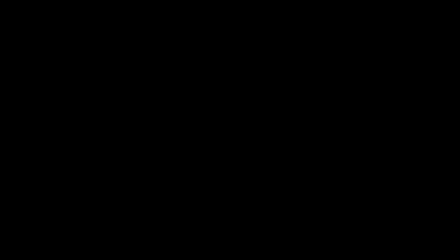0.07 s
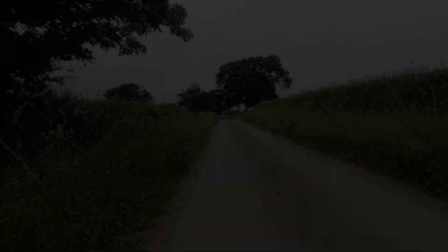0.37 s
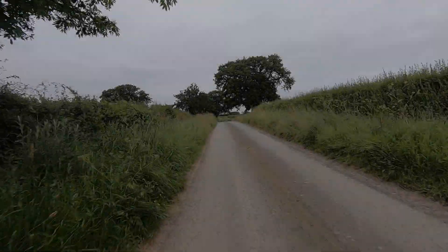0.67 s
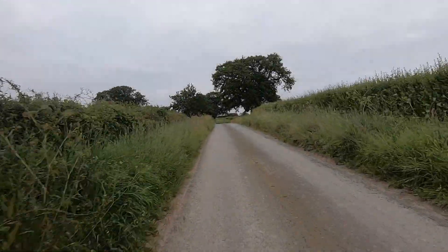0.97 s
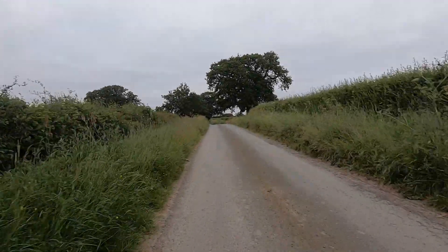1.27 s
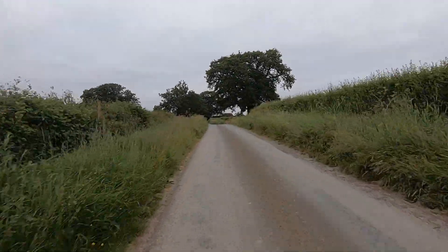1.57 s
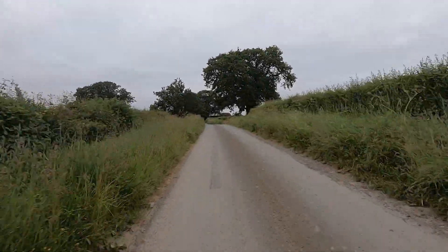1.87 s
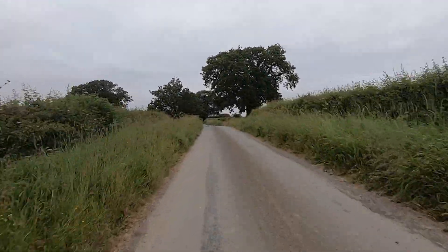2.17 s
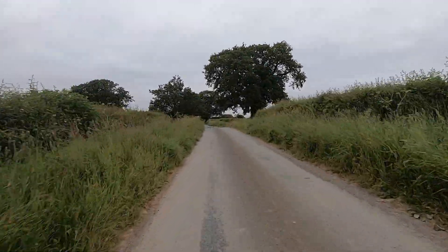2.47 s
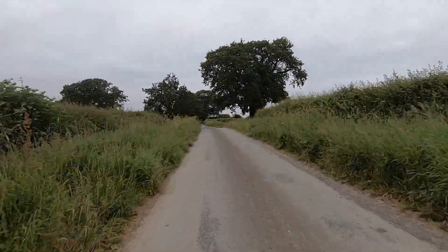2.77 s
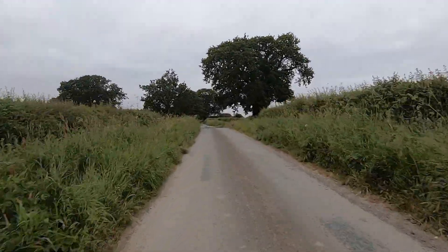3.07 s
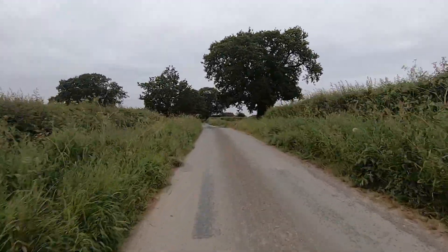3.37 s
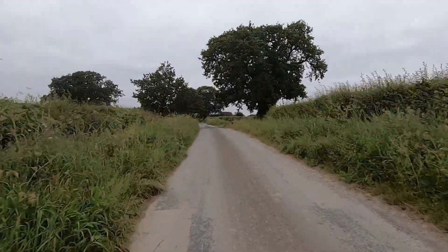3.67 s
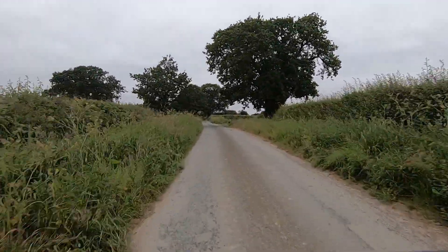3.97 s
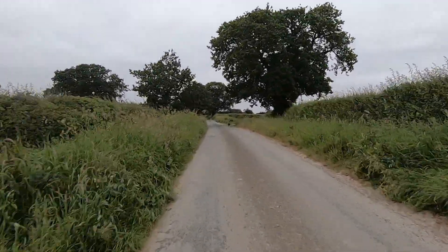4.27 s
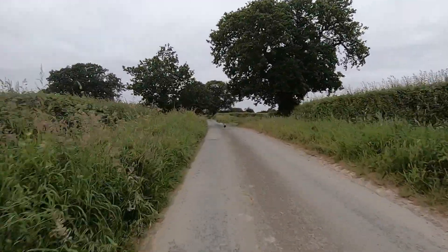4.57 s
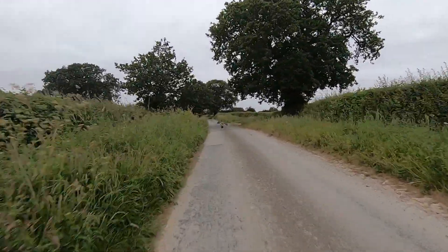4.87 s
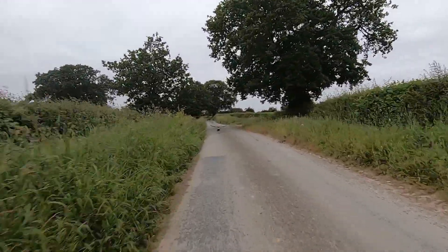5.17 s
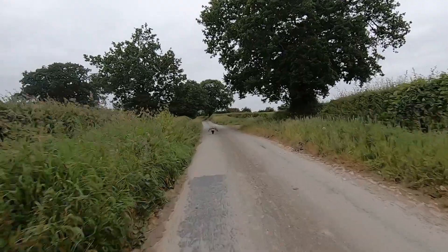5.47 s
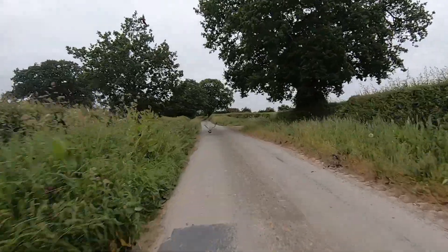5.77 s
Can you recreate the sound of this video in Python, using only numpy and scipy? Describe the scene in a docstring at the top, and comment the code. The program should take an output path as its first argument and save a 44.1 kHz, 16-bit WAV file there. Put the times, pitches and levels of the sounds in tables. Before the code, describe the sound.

Wind starts on the microphone almost at once, a low buffeting rumble that swells in short, irregular gusts and carries on to the end. The microphone rides on a bicycle in a country lane, and a soft, grainy tyre hiss and wheel whirr sit under the wind throughout. A few faint ticks come from a loose fitting in the first second. From about 1.6 to 2.9 seconds it rattles in quick, bright clusters with duller frame chatter, and again from 3.5 to 4.2 seconds. A crow then caws three times, at about 4.3, 4.8 and 5.3 seconds. Each caw is short, harsh and hoarse, rising then sagging in pitch, with a faint echo off the trees; the third is the loudest. The bicycle gives sharp clacks at about 5.0 and 5.7 seconds, and a strong gust hits just before the end.

```python
"""Crow over a country lane, from a bicycle.

The camera rides on the bicycle, so wind buffets its microphone. Close by, the tyres hiss on the
tarmac and a loose fitting rattles over the rough patches. A crow caws three times, harsh pulses
from its syrinx ringing throat, chest and beak, with a faint echo off the far trees."""
import sys
import numpy as np
from scipy import signal
from scipy.fft import rfft, irfft, next_fast_len
from scipy.io import wavfile
from scipy.ndimage import uniform_filter1d

SR = 44100
rng = np.random.default_rng(int(sys.argv[2]) if len(sys.argv) > 2 else 0)


def store_pcm(level_fs):
    """Save levels as 16-bit WAV."""
    pcm = np.round(np.clip(level_fs, -1, 1) * 32767).astype(np.int16)
    wavfile.write(sys.argv[1], SR, np.atleast_2d(pcm).T)


N = 261954
T = np.arange(N) / SR
LEAD_S = 0.015  # lead-in for the short fade-in before each tick's peak


def undb(db):
    """Decibels to gain."""
    return 10 ** (np.asarray(db) / 20)


def unit(x):
    """Scale to rms 1."""
    return x / np.sqrt(np.mean(x ** 2) + 1e-20)


def steady(x, span_s=0.021):
    """Hold the running rms near 1, keeping faster flutter."""
    return x / np.sqrt(uniform_filter1d(x ** 2, int(span_s * SR)) + 0.0011 * np.mean(x ** 2))


def curves(table, at):
    """Interpolate a table's later columns along its first."""
    points, *columns = np.transpose(table)
    return [np.interp(at, points, column) for column in columns]


def add(out, start_s, x):
    """Mix x into out from start_s on."""
    i = int(start_s * SR)
    out[i:i + len(x)] += x[:N - i]


def wander(size, hz):
    """A smooth random drift of rms 1 that moves up to about hz times a second."""
    f = np.arange(size // 2 + 1) * SR / size
    return unit(irfft(rfft(rng.standard_normal(size)) * np.exp(-(f / hz) ** 2), size))


def noise(spectrum):
    """Noise of rms 1, shaped by (Hz, dB) points."""
    hz, db = np.transpose(spectrum)
    size = next_fast_len(N, True)
    f = np.arange(size // 2 + 1) * SR / size
    gain = undb(np.interp(np.log(f + 1), np.log(hz), db))
    return unit(irfft(rfft(rng.standard_normal(size)) * gain, size)[:N])


def resonate(x, modes):
    """Parallel (Hz, width Hz, dB) resonances, each applied twice for deep valleys between them."""
    out = 0
    for hz, width, db in modes:
        b, a = signal.iirpeak(min(hz, 0.45 * SR), hz / width, SR)
        out = out + undb(db) * signal.lfilter(b, a, signal.lfilter(b, a, x))
    return out


def glide(x, hz, width_hz):
    """A moving resonance: shift its band down to zero, smooth twice and shift it back."""
    turn = np.exp(2j * np.pi * np.cumsum(hz) / SR)
    pole = np.exp(-np.pi * width_hz / SR)
    return (turn * signal.lfilter([(1 - pole) ** 2], [1, -2 * pole, pole ** 2], x / turn)).real


def wind(flutter_db=-13, rush_share=0.26):
    """Buffeting right on the microphone swells in gusts; eddies shake the flutter and rush above it."""
    # Airflow between gusts. Each row: time in seconds, relative dB of the buffeting and of the rush.
    airflow = [(0.12, -23, -46.5), (0.33, -25, -56.5), (0.44, -22.5, -42.5), (0.56, -21, -45),
               (0.7, -19, -46), (1.25, -20, -48.5), (1.85, -21.5, -48.5), (2.2, -18.5, -45.5),
               (2.7, -23, -52.5), (3.03, -24, -45), (3.35, -20, -47.5), (3.7, -23.5, -50), (3.95, -26, -46),
               (4.08, -20.5, -44.5), (4.35, -26.5, -49.5), (4.72, -26.5, -47), (4.95, -24, -44),
               (5.15, -23.5, -44.5), (5.55, -26, -42.5), (5.94, -20, -44.5)]
    # Gusts. Each row: middle and length in seconds, lift in dB of the buffeting and of the flutter.
    gusts = [(0.218, 0.1, 5, 6.5), (0.427, 0.11, 5, 8.5), (0.545, 0.08, 6.5, 11.5), (0.626, 0.059, 4, 10),
             (0.955, 0.054, 4.5, 8), (1.041, 0.037, 0.5, 6.5), (1.997, 0.036, 6, 1), (2.275, 0.072, 5, 8),
             (3.028, 0.074, 3.5, 4.5), (3.145, 0.12, 6.5, 1.5), (3.484, 0.05, 1, 1),
             (3.817, 0.077, 7.5, 3.5), (4.18, 0.12, 7.5, 6), (4.53, 0.11, 8, 11.5), (4.849, 0.087, 5, 8.5),
             (5.473, 0.13, 6, 1), (5.666, 0.09, 5.5, 9), (5.75, 0.025, 12, 7.5), (5.888, 0.031, 1, 14)]
    # The wind's low, middle and high bands. Each row: frequency in Hz, relative level in dB.
    buffet_spectrum = [(10, -16.5), (25, -2), (45, -2), (72, 3), (92, -2), (122, -5.5), (160, -16),
                       (260, -23), (600, -91), (3000, -120)]
    flutter_spectrum = [(80, -5.5), (170, 2), (250, -3), (360, -2.5), (480, -12.5), (750, -21.5),
                        (1500, -37), (4000, -69), (12000, -94)]
    rush_spectrum = [(300, 7), (600, 6), (850, -2.5), (1250, 1.5), (2500, -6), (5000, -17.5), (9000, -39),
                     (13000, -61.5)]
    flow_db, rush_db = curves(airflow, T)
    low_lift_db, high_lift_db = np.zeros(N), np.zeros(N)
    for middle_s, length_s, low_db, high_db in gusts:
        swell = np.exp(-(2 * (T - middle_s) / length_s) ** 2)
        low_lift_db += low_db * swell
        high_lift_db += high_db * swell
    eddies = wander(N, hz=69)
    buffet = steady(noise(buffet_spectrum), span_s=0.16)
    flutter = unit(noise(flutter_spectrum) * undb(2.5 * eddies))
    rush = unit(noise(rush_spectrum) * undb(1.5 * eddies))
    return (undb(flow_db + 0.5 + low_lift_db) * buffet
            + undb(flow_db + flutter_db + high_lift_db) * flutter
            + undb(rush_db + 3.5 + rush_share * high_lift_db) * rush)


def tyres(gain_db=4, grain_db=2):
    """Close by, the tyres hiss, grainy with the lane's chippings, and the wheels whirr."""
    # The road surface. Each row: time in seconds, relative tyre noise in dB.
    road = [(0.35, -55.5), (0.5, -57), (1.15, -58), (1.41, -56), (1.63, -53), (2.2, -56.5), (2.69, -57.5),
            (3.05, -55), (3.51, -54.5), (3.89, -56), (4.11, -55), (4.2, -59)]
    # Tyre hiss as coloured by the microphone. Each row: frequency in Hz, relative level in dB.
    hiss_spectrum = [(700, -25), (1400, -1.5), (2100, 3), (2900, 2), (3200, 0.5), (3550, 8), (4150, 2.5),
                     (4500, -8.5), (5000, -8.5), (5400, -25), (6400, -15), (7400, -23.5), (8100, -16),
                     (8800, -19.5), (10500, -29.5), (12000, -56)]
    # Resonances of the rolling wheels. Each row: frequency and width in Hz, gain in dB.
    wheel_modes = [(950, 95, 7.5), (1205, 150, 8), (1680, 120, 1.5), (1880, 130, -2), (2400, 300, -7),
                   (3790, 160, 5.5), (4750, 350, -16)]
    road_db, = curves(road, T)
    hiss = noise(hiss_spectrum) * undb(grain_db * wander(N, hz=90))
    whirr = undb(1.2) * unit(resonate(rng.standard_normal(N), wheel_modes))
    return undb(road_db + gain_db) * (hiss + whirr)


def contact(modes, peak_s, rise_s, decay_s, buzz_db, buzz_s):
    """Two parts snap together at LEAD_S + peak_s and buzz apart in tiny impacts that ring their modes."""
    t = T[:SR // 20] - LEAD_S - peak_s
    snap = np.exp(-np.abs(t) / np.where(t < 0, rise_s, decay_s))
    buzz = undb(buzz_db) * np.exp(-np.abs(t) / np.where(t < 0, buzz_s / 2, buzz_s))
    impacts = rng.laplace(size=len(t))
    impacts[np.argmin(np.abs(t))] = 7  # the one hard blow
    ring = resonate((snap + buzz) * impacts, modes)
    return ring / np.sqrt(uniform_filter1d(ring ** 2, SR // 500).max())  # loudest 2 ms at rms 1


def tick(detune=0.04, spread_db=3):
    """The loose fitting strikes, never quite on the same spot: bright snap, low knock, thin after-ring."""
    # The fitting's three sets of resonances. Each row: frequency and width in Hz, gain in dB.
    snap_modes = [(4490, 2030, 19), (5420, 720, 14), (7530, 1600, 16.5), (8470, 1540, 10.5),
                  (9900, 300, -12), (14300, 740, -4)]
    knock_modes = [(1870, 600, 3.5), (2350, 640, 4.9), (3696, 250, 7.5)]
    ring_modes = [(5970, 180, -6), (8420, 240, 0.5), (10240, 200, -7)]
    chance = rng.uniform(-1, 1, (len(snap_modes), 2))
    struck = [(hz * (1 + detune * shift), width, db + spread_db * lift)
              for (hz, width, db), (shift, lift) in zip(snap_modes, chance)]
    snap = contact(struck, peak_s=0.0022, rise_s=0.0011, decay_s=0.0012, buzz_db=-12.5, buzz_s=0.013)
    knock = contact(knock_modes, peak_s=0.00069, rise_s=0.0016, decay_s=0.0053,
                    buzz_db=-37, buzz_s=0.006)
    ring = contact(ring_modes, peak_s=0.002, rise_s=0.001, decay_s=0.008, buzz_db=-11, buzz_s=0.015)
    return snap + undb(-3) * knock + undb(-22) * ring


def rattles(tick_db=-2, clack_db=-3, chatter_db=-5, strays_per_s=3.4):
    """Close to the microphone, bumps shake the fitting, the frame chatters and something clacks."""
    # Further single ticks, many following closely on one another, sharp clacks and dull frame chatter. Each
    # row: time in seconds, relative peak in dB.
    ticks = [(0.468, -45), (0.5994, -46.5), (0.756, -47.5), (1.6, -33), (1.7892, -46.5), (1.936, -42),
             (1.993, -34), (2.038, -37), (2.412, -48), (2.448, -44), (2.621, -36.5), (2.711, -44),
             (2.8703, -41), (3.0176, -48), (3.318, -50), (3.593, -53), (3.673, -39), (3.693, -39),
             (3.7275, -32.5), (3.766, -38.5), (3.7927, -37.5), (3.833, -37), (4.016, -40), (4.046, -36),
             (4.101, -31), (4.173, -39.5), (4.243, -52), (5.2534, -35.5)]
    clacks = [(3.756, -33), (5.0273, -23.5), (5.6786, -24)]
    chatter = [(2.308, -34), (2.4112, -35), (2.4284, -31.5), (2.49, -28), (2.537, -37), (3.9543, -35),
               (3.9732, -34), (4.087, -26.5), (5.727, -27.5)]
    # The fitting bouncing. Each row: start in seconds, number of ticks, gap in seconds, relative
    # first peak in dB, growth to the last in dB, offset of every second tick in dB.
    bounces = [(1.0582, 2, 0.041, -44.5, -2, 1), (1.685, 3, 0.02, -42, 0, 7),
               (2.0916, 2, 0.037, -37, 4.5, -0.5), (2.2622, 2, 0.025, -35.5, -3, -0.5),
               (2.3151, 3, 0.022, -35, 2.5, -6), (2.4953, 3, 0.027, -35.5, 1.5, -10),
               (3.486, 3, 0.025, -43.5, 11, 0.5), (3.6349, 3, .031, -32, 0.5, 2),
               (3.853, 3, .029, -33, 2.5, -8)]
    # Resonances of the clacking part and the frame. Each row: frequency and width in Hz, gain in dB.
    clack_modes = [(3270, 1000, -2), (4830, 460, -11.5), (6300, 1000, -14.5), (8240, 490, -18.5)]
    frame_modes = [(1790, 660, 0), (2460, 410, -5), (3180, 1230, -3.5), (4700, 730, -16)]
    out = np.zeros(N)
    for s, db in ticks:
        add(out, s - LEAD_S, undb(db + tick_db) * tick())
    for s, count, gap_s, first_db, growth_db, rebound_db in bounces:
        for k, grown_db in enumerate(np.linspace(0, growth_db, round(count))):
            db = first_db + grown_db + rebound_db * (k % 2)
            add(out, s + k * gap_s - LEAD_S, undb(db + tick_db) * tick())
    for s, db in clacks:
        clack = contact(clack_modes, peak_s=0.0017, rise_s=0.00051, decay_s=0.00097,
                        buzz_db=-11, buzz_s=0.012)
        add(out, s - LEAD_S, undb(db + clack_db) * clack)
    for s, db in chatter:
        shake = contact(frame_modes, peak_s=0.0015, rise_s=0.00088, decay_s=0.0026,
                        buzz_db=-9, buzz_s=0.032)
        add(out, s - LEAD_S, undb(db + chatter_db) * shake)
    for when, strength in rng.random((round(strays_per_s * T[-1]), 2)):  # faint stray ticks
        add(out, when * T[-1], undb(-58.75 + 7 * strength) * tick())
    return out


def syrinx(pitch_hz, strain, throb_db, hoarseness, throb_hz=47, doubling=0.6):
    """Unsteady membranes chop the breath into pulses; returns the voice and an airy one for the rasp."""
    size = len(pitch_hz)
    # A slow, uneven second oscillation shakes both pitch and level: the harsh throb.
    throb = 2 * np.pi * np.cumsum(throb_hz * (1 + 0.2 * wander(size, hz=42))) / SR
    jitter = 0.0263 * wander(size, hz=320) + 0.0132 * wander(size, hz=40) - 0.026 * np.cos(throb)
    roughness = undb(strain * (throb_db * np.sin(throb) + wander(size, hz=220)))
    phase = 2 * np.pi * np.cumsum(pitch_hz * (1 + strain * jitter)) / SR
    # The overtones arrive out of step, which smears the pulses.
    pulses = unit(sum(np.cos(k * phase + 2 * np.pi * rng.random()) for k in range(2, 28)))
    air = unit(rng.standard_normal(size) * (1 + 0.5 * np.cos(phase)))
    alternation = doubling * pulses * np.cos(phase / 2)  # strong and weak pulses take turns
    voice = roughness * (pulses + hoarseness * strain ** 2 * (air + alternation))
    return voice, roughness * (pulses + 0.78 * air)


def rasp(airy_voice, closing, open_hz=6370, shut_hz=5800):
    """The airy voice rings high resonances and a hiss that sinks as the beak closes."""
    # The steady treble resonances. Each row: frequency and width in Hz, gain in dB.
    rasp_modes = [(4700, 420, -9), (5900, 2050, 12.5), (9600, 3000, -12), (13000, 3100, -14)]
    hiss = glide(airy_voice, open_hz + (shut_hz - open_hz) * closing, width_hz=1100)
    return steady(resonate(airy_voice, rasp_modes)) + undb(-1.5) * steady(hiss)


def caw(length_s, top_hz, scoop, sag, level_db, chest_db, dip_db, throb_db, hoarseness,
        crest_s=0.078, open_hz=2310, shut_hz=1590):
    """The beak opens to a crest and closes; pitch, throat resonance and level follow the same arch."""
    # The bird's resonances. Each row: frequency and width in Hz, gain in dB.
    side_cavity = [(1980, 330, -3.5)]
    windpipe_modes = [(1750, 100, -7)]
    chest_modes = [(1465, 260, 0)]
    beak_modes = [(2654, 520, 1), (3105, 290, 0.5)]
    t = T[:int(length_s * SR)]
    to_open = np.clip(1 - t / crest_s, 0, 1)
    closing = np.clip((t - crest_s) / (length_s - crest_s), 0, 1)
    crest = np.exp(-((t - crest_s) / 0.03) ** 2)
    pitch_hz = top_hz * (1 - scoop * to_open ** 2 - sag * closing ** 2)
    strain = 1 - 0.6 * closing  # the roughness calms towards the end
    voice, airy_voice = syrinx(pitch_hz, strain, throb_db, hoarseness)
    voice = voice - resonate(voice, side_cavity)  # the throat's side cavity swallows one band
    throat_hz = open_hz + (shut_hz - open_hz) * (to_open ** 2 + closing)
    throat = glide(voice, throat_hz, width_hz=440)
    # Around the crest the chest takes over from the throat.
    sound = undb(-dip_db * crest) * steady(throat)
    sound += undb(chest_db - 7.5 * (1.5 - crest)) * steady(resonate(voice, chest_modes))
    sound += np.sqrt(closing) * resonate(voice / np.std(throat), windpipe_modes)
    release_db = -5.5 * np.clip(1 - (length_s - t) / 0.026, 0, 1)  # beak and rasp fade first
    sound += undb(-6.5 + release_db) * steady(resonate(voice, beak_modes))
    sound += undb(-22.5 + 3.5 * closing + release_db) * rasp(airy_voice, closing)
    # The voice swells, tires as the pitch sags, and catches just before its last push.
    effort_db = level_db - 10.5 * np.clip(1 - t / 0.059, 0, 1) - 6 * closing ** 2
    catch_db = -6 * np.exp(-((length_s - 0.031 - t) / 0.0089) ** 2)
    fade = np.clip(np.minimum(t, length_s - t) / 0.015, 0, 1)
    return undb(effort_db + catch_db) * sound * fade


def scatter(x, t60_s):
    """Half a second of countless small reflections, falling at 60 dB per t60_s."""
    t = T[:SR // 2]
    response = rng.standard_normal(len(t)) * undb(-60 * t / t60_s)
    return signal.fftconvolve(x, response / np.linalg.norm(response))[:N]


def crow():
    """Three caws reach the microphone directly, off the near hedge and dully off the far trees."""
    # Each row: start and length in seconds, top pitch in Hz, scoop up to it and sag after it as shares,
    # relative level, chest level, throat dip at the crest and throb depth in dB, hoarseness from 0 to 1.
    caws = [(4.288, 0.218, 472.7, 0.19, 0.4, -34.5, -3.5, 2, 3, .45),
            (4.757, 0.24, 487.3, 0.26, 0.4, -34, 4.5, 9, 2, 0.9),
            (5.317, .203, 464.6, .11, .29, -30, -0.5, 4.5, 4, .42)]
    # The bands the trees send back. Each row: frequency and width in Hz, gain in dB.
    tree_bands = [(1695, 95, 3), (2500, 1100, -9)]
    direct = np.zeros(N)
    for start_s, *shape in caws:
        add(direct, start_s, caw(*shape))
    hedge = undb(-8) * scatter(direct, t60_s=0.1)
    trees = undb(-5) * resonate(scatter(direct, t60_s=1.0), tree_bands)
    return undb(-0.4) * (direct + hedge) + trees


def scene():
    """The lane in mono, as heard from the moving bicycle."""
    return (crow() + wind() + tyres() + rattles())[None]


def record(dry, start_s=0.106, ceiling=0.64, top_hz=15500):
    """After a brief silence the camera rounds the strongest buffets; the treble is dull, the top cut."""
    # Treble dulled by about 9 dB above 11 kHz. Each row: frequency in Hz, gain in dB.
    treble_shelf = [(10000, 0), (10800, -1.5), (11700, -9.5), (15000, -9)]
    fade_in = np.clip((T - start_s) / 0.001, 0, 1)
    rounded = ceiling * np.tanh(dry * fade_in / ceiling)
    size = next_fast_len(N + SR // 10, True)
    treble_db, = curves(treble_shelf, np.arange(size // 2 + 1) * SR / size)
    dulled = irfft(rfft(rounded, size) * undb(treble_db), size)[:, :N]
    lowpass = signal.ellip(8, 0.2, 70, top_hz, fs=SR, output="sos")
    return signal.sosfilt(lowpass, dulled)


dry = scene()
out = record(dry)
store_pcm(out)
```